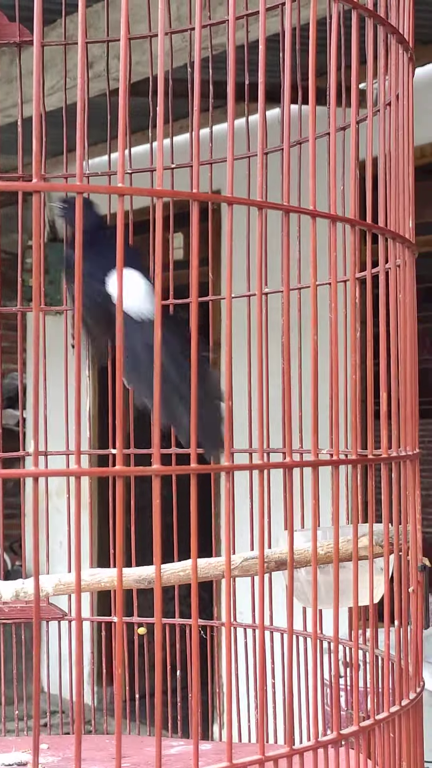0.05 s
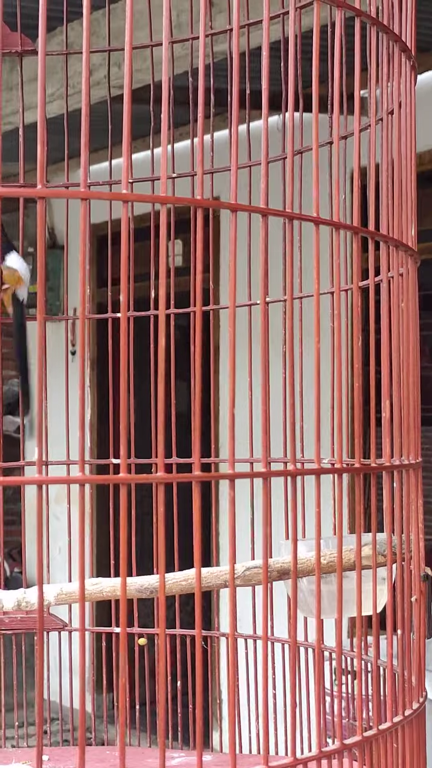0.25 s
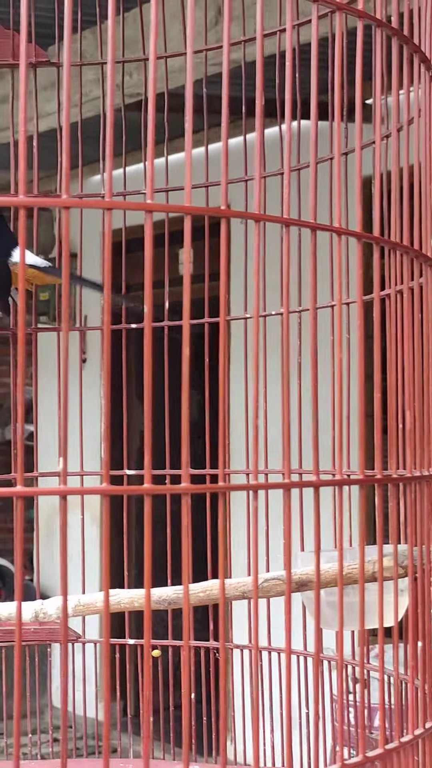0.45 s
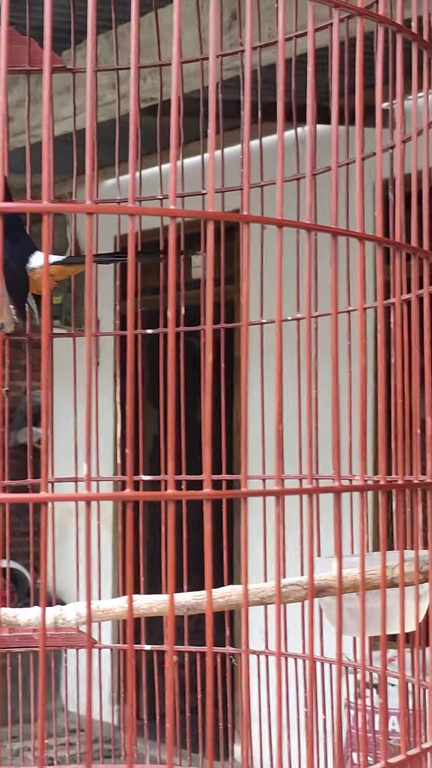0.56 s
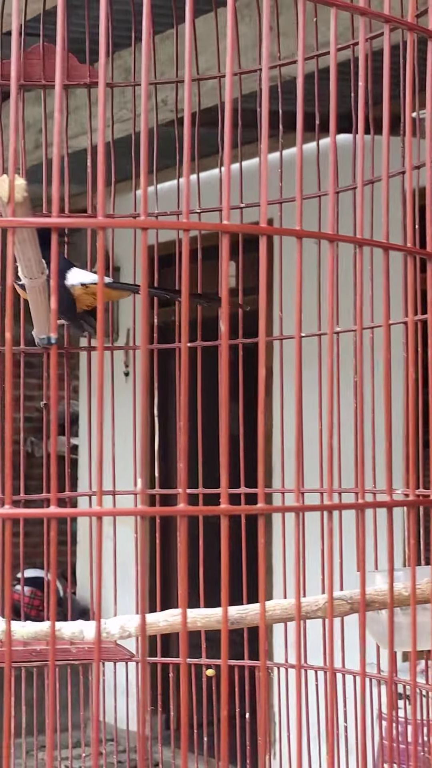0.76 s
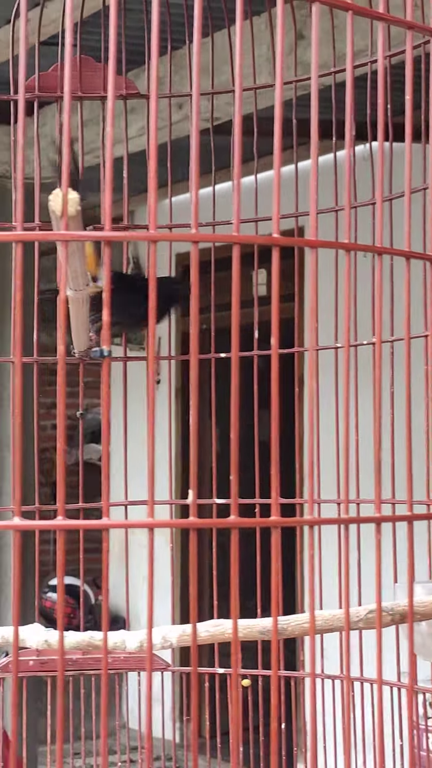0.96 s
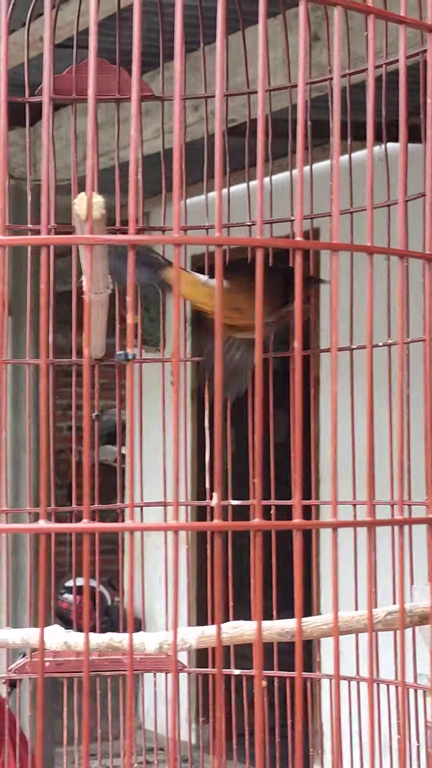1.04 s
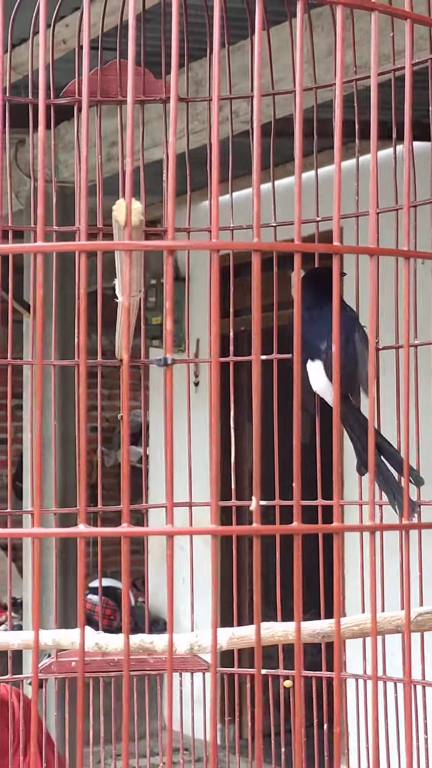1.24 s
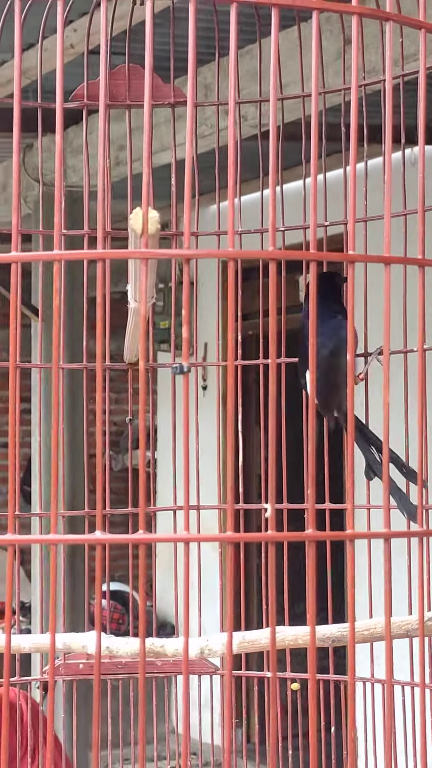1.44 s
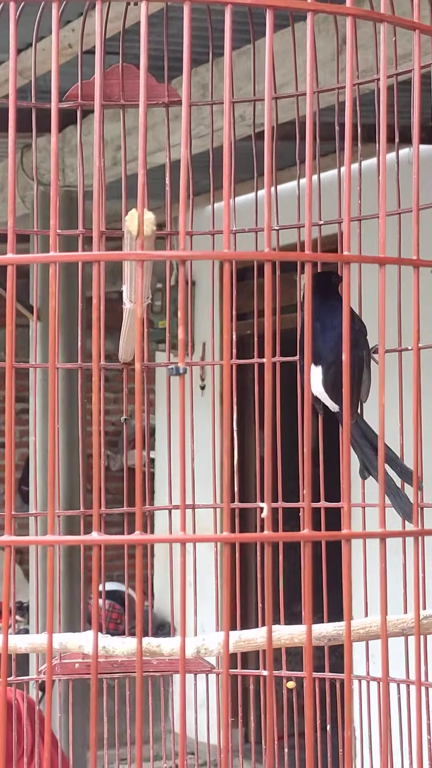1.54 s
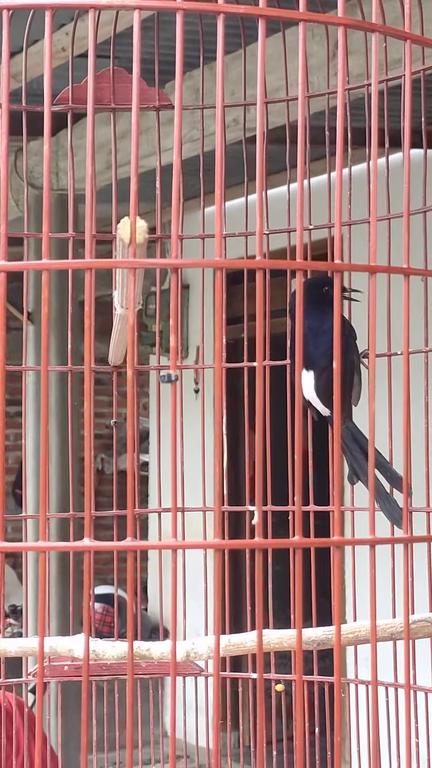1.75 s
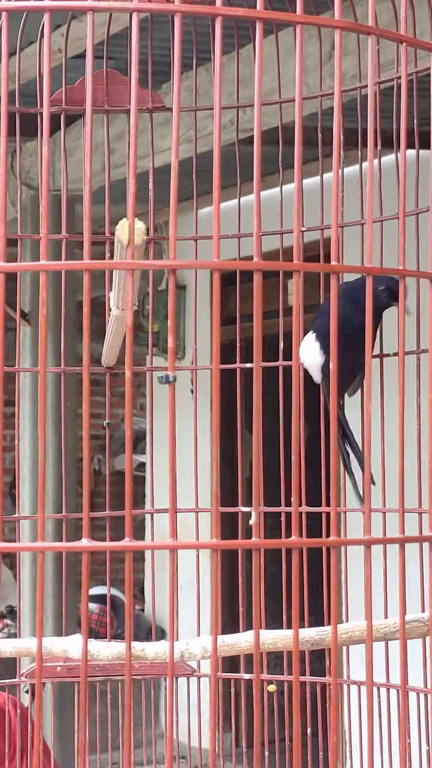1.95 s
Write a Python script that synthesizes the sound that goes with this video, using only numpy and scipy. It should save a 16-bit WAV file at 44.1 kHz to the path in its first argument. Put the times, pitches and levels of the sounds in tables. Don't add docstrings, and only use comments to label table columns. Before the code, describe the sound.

Close, loud songbird whistles sweep upward, then tumble in quick short notes, turn to high scratchy squeaks and end on low nasal calls, with wing rush, bar taps, faint insects and a sudden bright hiss last.

```python
import sys
import numpy as np
from scipy import signal
from scipy.fft import rfft, irfft
from scipy.io import wavfile
from scipy.ndimage import uniform_filter1d

SR = 44100
rng = np.random.default_rng(int(sys.argv[2]) if len(sys.argv) > 2 else 0)


def store_pcm(level_fs):
    pcm = np.round(np.clip(level_fs, -1, 1) * 32767).astype(np.int16)
    wavfile.write(sys.argv[1], SR, np.atleast_2d(pcm).T)


def elevation(decibels):
    levels = np.asarray(decibels, float)
    return 10 ** (levels / 20)


N = 88200
CHANGE_S = 1.9683


def evened(x):
    return x / np.sqrt(np.mean(x ** 2) + 1e-20)


def read(points, hz):
    f, value = np.transpose(points)
    return np.interp(np.log(hz + 1), np.log(f + 1), value)


def follow(curve):
    s, db = np.transpose(curve)
    return elevation(np.interp(np.arange(N) / SR, s, db))


def add(mix, s, sound):
    part = mix[round(s * SR):][:len(sound)]
    part += sound[:len(part)]


def drift(size, span_s):
    span = max(int(span_s * SR), 2)
    once = uniform_filter1d(rng.standard_normal(size), span)
    return evened(uniform_filter1d(once, span))


def coloured(x, gain_db):
    return irfft(rfft(x, axis=-1) * elevation(gain_db), N, axis=-1)


def hiss(colour, patchy_db, same):
    frames = N // 128 + 5
    a, b, c, d, patch = rng.standard_normal((frames, 257, 5)).T
    patch = uniform_filter1d(patch, size=4, axis=0)
    patch = evened(uniform_filter1d(patch, size=10, axis=1))
    left, other = a + 1j * b, c + 1j * d
    right = same * left + np.sqrt(1 - same ** 2) * other
    z = np.array([left, right]) * elevation(patchy_db * patch)
    x = signal.istft(z, nperseg=512, noverlap=384)[1][:, :N]
    f = np.fft.rfftfreq(N, 1 / SR)
    outside = (f < colour[0][0]) | (f > colour[-1][0])
    return evened(coloured(x, read(colour, f) - 60 * outside))


def tone(hz, orders_db, wobble):
    # f/Hz, level/dB
    beak = [(2200, 0.5), (5000, -16), (6100, -6.5), (7600, -14.5), (9300, 10.5), (10500, -3.5),
            (12000, -13.5)]
    turns = np.cumsum(hz * (1 + wobble * drift(len(hz), 0.0077))) / SR
    out = np.zeros(len(hz))
    for k, db in enumerate(orders_db, 1):
        shake_db = 1.06 * min(k - 1, 5) * drift(len(hz), 0.0027)
        level = elevation(db + read(beak, k * hz) + shake_db)
        audible = k * hz < SR / 2.2
        out += level * audible * np.sin(2 * np.pi * k * turns)
    return np.sqrt(2) * out


def note(curve, orders_db, wobble, shimmer_db, air_db):
    # f/Hz, level/dB
    breath = [(700, -35.5), (2100, 19), (2700, -29.5), (5200, -17.5), (6400, 4), (10900, -8),
              (13200, -12.5)]
    s, hz, db = np.transpose(curve)
    t = np.arange(s[0], s[-1], 1 / SR)
    pitch = uniform_filter1d(np.interp(t, s, hz), size=130, mode="nearest")
    level_db = uniform_filter1d(np.interp(t, s, db), size=130, mode="nearest")
    edge = np.clip(np.minimum(t - s[0], s[-1] - t) / 0.0023, 0, 1)
    air_gain = elevation(read(breath, np.fft.rfftfreq(len(t), 1 / SR)))
    air = evened(irfft(rfft(rng.standard_normal(len(t))) * air_gain, len(t)))
    voice = elevation(shimmer_db * drift(len(t), 0.0097)) * tone(pitch, orders_db, wobble)
    return s[0], edge * (elevation(level_db) * voice + elevation(air_db + 0.5 * (level_db + 36)) * air)


def rasp(start, length, hz, level_db, rough):
    harmonics_db = [2, -39]
    t = np.arange(0, length, 1 / SR)
    shape = np.minimum(t / 0.013, 1) * np.minimum((length - t) / 0.0066, 1)
    shake = elevation(3.8 * min(rough, 1) * np.clip(drift(len(t), 0.001), -3, 1.5))
    return start, elevation(level_db) * shape * shake * tone(hz + 0 * t, harmonics_db, 0.0357 * rough)


def tick(s, level_db, hz, width, t60):
    t = np.arange(0, 0.08, 1 / SR)
    b, a = signal.butter(3, [hz - width / 2, hz + width / 2], "band", fs=SR)
    ring = evened(signal.lfilter(b, a, rng.standard_normal(len(t))))
    return s, np.minimum(t / 0.0014, 1) * elevation(level_db - 60 * t / t60) * ring


def far_murmur():
    # f/Hz, level/dB per Hz
    murmur = [(200, -39.5), (800, -27), (1000, -2.5), (2000, -7), (3000, -22), (12000, -47.5)]
    # t/s, level/dB
    swell = [(0, 9.5), (.1, 3.5), (.16, 8), (1.4, 6.5), (1.55, -6.5)]
    return elevation(-64.5) * follow(swell) * hiss(murmur, 4.5, 0.34)


def insects():
    # t/s, level/dB
    swell = [(0, -1), (.115, -14), (.135, -1), (.6, -2), (1.1, 2), (1.5, 0.5), (2, -0.5)]
    centre_hz, width_hz = 5833, 405
    band = [(centre_hz + k * width_hz, -9.0 * k * k) for k in range(-3, 4)]
    throb = elevation(-58.5 + 3.5 * drift(N, 0.013))
    return follow(swell) * throb * hiss(band, 0.77, 0.23) * elevation([[3], [-3]])


def dove():
    # t/s, f/Hz, level/dB
    coo = [(.15, 600, -84.5), (.2, 620, -77.5), (.292, 632, -62), (.315, 632, -73.5), (.47, 631, -82),
           (.52, 607, -94)]
    out = np.zeros(N)
    add(out, *note(coo, [6], 0.0036, 5.0, -99))
    return out * elevation([[-5], [3]])


def yard():
    return far_murmur() + insects() + dove()


def after_change():
    # f/Hz, level/dB per Hz
    bright = [(400, -37), (750, -10), (3100, -25), (5000, 7), (6500, -5.5), (12000, -13.5), (15800, -29)]
    # f/Hz, level/dB per Hz
    thump = [(30, -5), (75, 1), (130, -9.5), (300, -28)]
    t = np.maximum(np.arange(N) / SR - CHANGE_S, 0)
    snap = 1 + elevation(9.5 - 60 * t / 0.048)
    return elevation(-37.5 - 17 * t) * snap * hiss(bright, 2.5, 0.26) + elevation(-55.5) * hiss(thump, 1.5, 0.92)


def wind_and_rush():
    # t/s, level/dB
    gusts = [(.72, -83), (.8, -76), (.97, -84.5), (1.05, -72.5), (1.24, -62), (1.34, -80), (1.52, -68.5),
             (1.72, -70), (1.85, -83)]
    # f/Hz, level/dB per Hz
    draught = [(25, -29.5), (62, 6.5), (150, -7), (250, -21), (480, -22.5)]
    # t/s, level/dB
    rush = [(.62, -77), (.7, -60), (.83, -61), (.875, -58), (.95, -56.5), (1.0, -80), (1.12, -68),
            (1.16, -46), (1.3, -44), (1.4, -51), (1.5, -62.5), (1.6, -68), (1.9, -77)]
    # f/Hz, level/dB per Hz
    feathers = [(1800, -7), (2900, -2.5), (3400, -12.5), (4600, -2.5), (8800, -7.5), (10300, -17),
                (12000, -14.5), (15000, -24)]
    return follow(gusts) * hiss(draught, 0.93, 1.0) + follow(rush) * hiss(feathers, 4.1, 0.16)


def thin_sounds(out):
    # t/s, length/s, f/Hz, level/dB, roughness/0-1
    thin = [
        (1.114, 0.092, 416, -75.5, 0.88),
        (1.361, 0.31, 1507, -67, 0.37),
            (0.78, 0.098, 3380, -59.5, 0.88), (.965, 0.14, 3590, -54.5, .9),
                 (1.154, .12, 2930, -49, 0.48), (1.616, 0.052, 8200, -53, 0.19),
                 (1.614, 0.046, 10830, -53, 0.62), (0.025, 0.046, 2140, -64, 0.37),
                 (1.1, 0.085, 11600, -48.5, 0.39), (1.125, .12, 8800, -66.5, .5),
                 (0.025, 0.047, 720, -78, 0.8), (1.555, 0.051, 1020, -67, 1),
                 (1.925, 0.022, 12300, -61, .6), (0.74, 0.042, 1900, -50, 1)]
    for row in thin:
        add(out, *rasp(*row))


def cage_taps(out):
    # t/s, level/dB, centre f/Hz, width/Hz, t60/s
    taps = [
        (0.709, -40, 9370, 2300, 0.052),
        (.712, -56, 14500, 1210, 0.014),
        (0.773, -44.5, 9000, 2620, 0.04),
        (0.858, -54, 10900, 6600, 0.097),
        (0.946, -48.5, 9320, 2970, 0.15),
        (1.147, -43, 9000, 4370, 0.016),
    ]
    for row in taps:
        add(out, *tick(*row))


def rasps(out):
    # t/s, length/s, f/Hz, level/dB, roughness/0-1
    squeaks = [
        (1.142, 0.062, 5874, -36, 0.4),
        (1.203, 0.032, 6050, -37, 0.5),
        (1.2, 0.015, 6480, -25, 0),
        (1.233, 0.081, 4607, -33.5, 0.46),
        (1.239, 0.11, 5960, -46.5, 0.1),
        (1.281, 0.048, 3827, -38, 0.24),
        (1.306, 0.08, 5010, -39.5, 0.79),
    ]
    # t/s, length/s, f/Hz, level/dB, roughness/0-3
    chips = [
        (.937, .024, 2330, -35, .3),
        (1.6, .028, 1610, -44, 1.3),
        (1.764, .024, 1325, -39, .2),
        (1.79, .055, 1325, -48, .4),
        (1.924, .024, 1055, -46, .9),
        (1.924, .042, 2210, -45, 1.6),
        (1.935, .028, 1335, -39, .5),
        (1.63, .14, 3455, -61, .15),
        (1.79, .07, 3455, -63, .15),
    ]
    for row in squeaks + chips:
        add(out, *rasp(*row))


def low_calls(out):
    # t/s, f/Hz, level/dB
    calls = [
        [(1.612, 569.3, -55), (1.64, 673, -34), (1.656, 709, -35.5), (1.664, 791.5, -29.5),
         (1.735, 774.4, -28.5), (1.754, 782.6, -24), (1.759, 806, -45)],
        [(1.764, 783, -35), (1.8, 772, -37), (1.82, 757.4, -34), (1.865, 739, -52.5), (1.92, 768, -48)],
        [(1.945, 749, -36), (1.975, 819.4, -33)],
    ]
    harmonics_db = [-16, -3, -30, -35.5, -45, -43.5, -42, -22.5, -33, -27.5, -40, -61, -42, -34]
    # t/s, f/Hz, level/dB
    undertone = [(1.705, 770.6, -49), (1.725, 754.6, -43.5), (1.76, 769.6, -52.5), (1.8, 786.2, -47.5),
                 (1.825, 770.3, -34), (1.845, 773.6, -53.5), (1.87, 778.2, -51), (1.968, 776, -57)]
    for curve in calls:
        add(out, *note(curve, harmonics_db, 0.0048, 1.93, -56))
    add(out, *note(undertone, [0], 0.002, 1.2, -99))


def whistles(out):
    # t/s, f/Hz, level/dB
    slow = [
        [(.19, 1629, -52), (.204, 1644, -37), (.23, 1751, -26.5), (.256, 1875, -18.5), (.276, 2123, -21.5),
         (.286, 2356, -24.5), (.294, 2630, -42.5)],
        [(.335, 2060, -31.5), (.352, 1955, -28.5), (.371, 1925, -19.5), (.386, 2094, -18), (.397, 2187, -13),
         (.404, 2420, -23.5), (.412, 2690, -32), (.418, 2560, -40.5)],
        [(.486, 2226, -34.5), (.496, 2055, -21.5), (.516, 1910, -21.5), (.532, 2038, -26), (.554, 2193, -19),
         (.564, 2345, -23.5), (.58, 2167, -24.5), (.59, 2180, -49)],
    ]
    # t/s, f/Hz, level/dB
    quick = [
        [(.652, 595, -74), (.688, 1132, -31), (.696, 1120, -49)],
        [(.71, 2286, -21.5), (.716, 1902, -28), (.72, 1447, -29), (.732, 1428, -28.5), (.744, 1295, -32.5),
         (.758, 1190, -49)],
        [(.772, 2194, -29.5), (.778, 1462, -27.5), (.79, 1422, -35), (.805, 1387, -35), (.835, 1294, -50),
         (.85, 1400, -48), (.865, 1336, -72)],
        [(.95, 1835, -36.5), (.962, 1598, -31.5), (.97, 1510, -35)],
        [(.973, 1584, -30), (.996, 1894, -19.5), (1.008, 2178, -20), (1.014, 2610, -28), (1.026, 2654, -29)],
    ]
    harmonics_db = [0.5, -31.5, -38, -38.5, -33.5, -40.5]
    for curve in slow + quick[-1:]:
        add(out, *note(curve, harmonics_db, 0.0077, 0.51, -85))
    for curve in quick[:-1]:
        add(out, *note(curve, harmonics_db[:2], 0.0347, 3.1, -61.5))


def bird():
    out = np.zeros(N)
    thin_sounds(out)
    cage_taps(out)
    rasps(out)
    low_calls(out)
    whistles(out)
    return out


def porch(x):
    # f/Hz, t60/s
    decay = [(500, 0.5), (1100, 0.55), (1500, 0.39), (2500, 0.33), (6000, 0.53), (12000, 0.18)]
    # delay/s, level/dB
    echoes = [
        (.0057, -8),
        (.0094, -11),
    ]
    # f/Hz, left over right/dB
    high_pan = [(1500, -1), (6000, 10.5), (9000, -14.5), (13000, 5.5)]
    lag_s, pan_db, likeness = 0.00013, 4, 0.089

    taps = np.zeros((2, SR))
    at = np.arange(700, SR - 20, 20) + rng.integers(0, 20, (2, (SR - 701) // 20))
    np.put_along_axis(taps, at, rng.choice([-1., 1.], at.shape), 1)
    hz, t, z = signal.stft(taps, SR, nperseg=256)
    fading = z * elevation(-60 * t / read(decay, hz)[:, None])
    tail = signal.istft(fading, SR, nperseg=256)[1][:, :SR]
    tail *= elevation(-7) / np.linalg.norm(tail[0])
    tail[1] = likeness * tail[0] + np.sqrt(1 - likeness ** 2) * tail[1]

    tail[[0, 1], [round(lag_s * SR), 0]] += elevation([pan_db / 2, -pan_db / 2])
    for k, (s, db) in enumerate(echoes):
        tail[[0, 1], round(s * SR) + np.array([k % 3 * 5, 4])] += (-1) ** k * elevation(db)
    pan = read(high_pan, np.fft.rfftfreq(N, 1 / SR)) / 2
    return coloured(signal.fftconvolve(x[None], tail, axes=1)[:, :N], [pan, -pan])


def scene():
    late = np.clip((np.arange(N) / SR - CHANGE_S) / 0.00028, 0, 1)
    return (1 - late) * (porch(bird()) + yard() + wind_and_rush()) + late * after_change()


def low_pass(x):
    return signal.sosfilt(signal.butter(12, 15870, fs=SR, output="sos"), x)


def record(dry):
    # f/Hz, level/dB
    threshold = [(300, -112), (2700, -90), (10000, -90), (15000, -87)]
    hz, _, z = signal.stft(dry, SR, nperseg=1024)
    power = (abs(z[:, :512]) ** 2).mean(0).reshape(64, 8, -1).mean(1)
    scatter = uniform_filter1d(rng.standard_normal(power.shape), size=12, axis=1)
    power *= elevation(10.5 * evened(scatter))
    power = np.repeat(power, 8, axis=0)[np.minimum(np.arange(513), 511)]
    weakness = elevation(read(threshold, hz))[:, None] ** 2 / (power + 1e-20)
    keep = 1 / (1 + weakness ** 4)
    mix = signal.istft(z * keep, SR, nperseg=1024)[1][:, :N]
    return low_pass(mix)


dry = scene()
out = record(dry)
store_pcm(out)
```